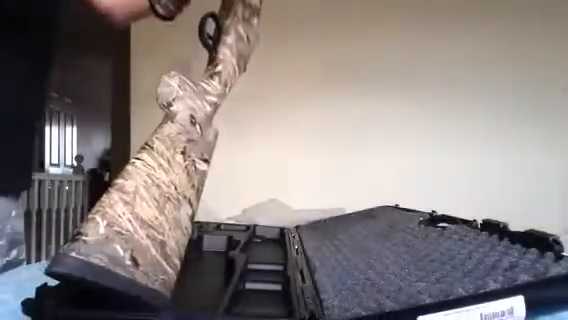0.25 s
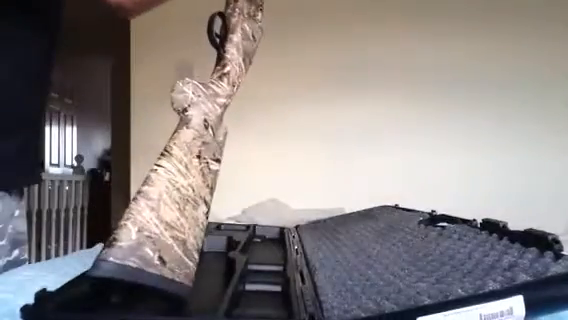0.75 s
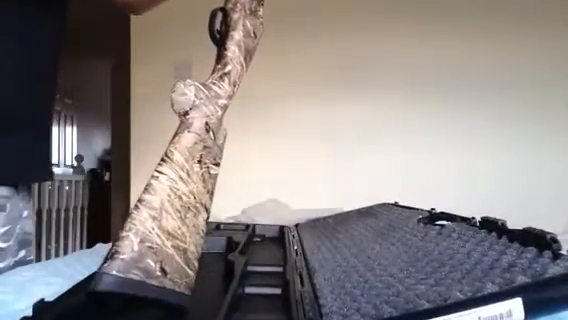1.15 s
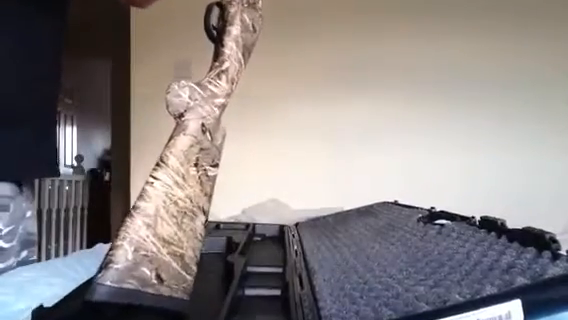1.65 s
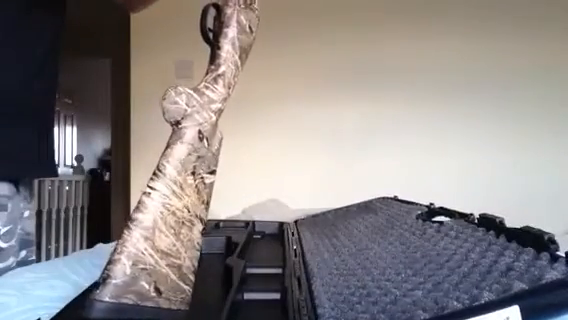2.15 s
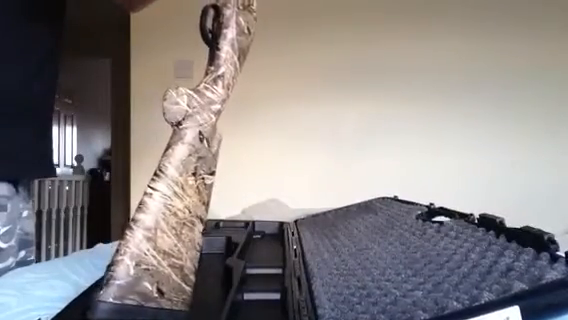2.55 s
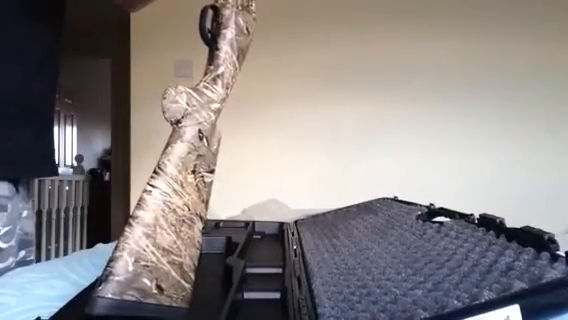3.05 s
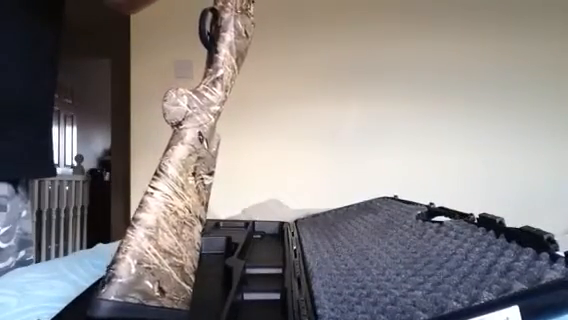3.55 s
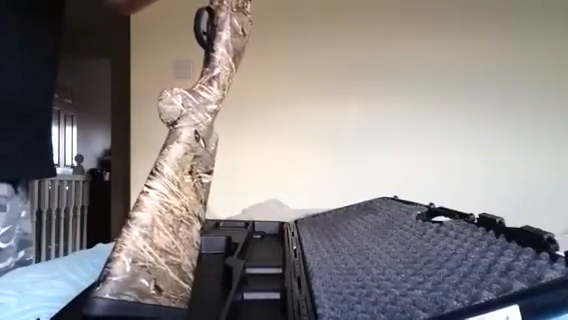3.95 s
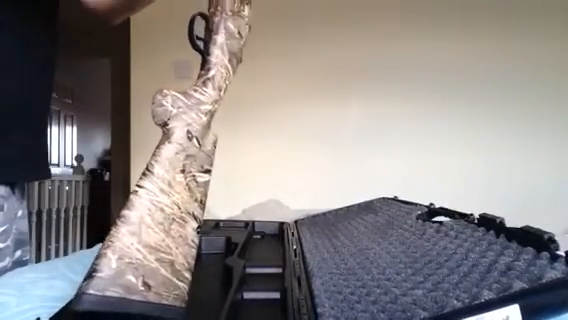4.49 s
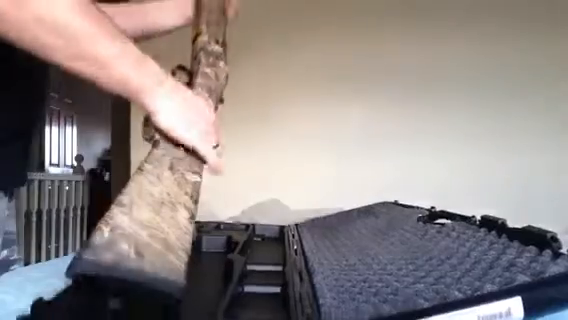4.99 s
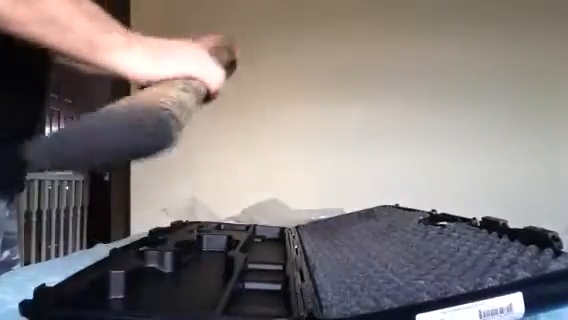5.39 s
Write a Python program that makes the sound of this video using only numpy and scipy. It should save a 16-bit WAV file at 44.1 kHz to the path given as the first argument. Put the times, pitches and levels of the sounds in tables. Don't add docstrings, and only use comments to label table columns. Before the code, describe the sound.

A long gun with plastic stock and steel barrel is assembled near a modest microphone indoors. Skin brushes and tiny clicks give way to a cluster of knocks and clinks; the barrel scrapes and slams home in a fast clatter. After near silence and a small knock, a latch cracks shut, then bright clicks and soft handling end it, with brief room reflections and a low noise floor.

```python
import sys
import numpy as np
from scipy import signal
from scipy.fft import rfft, irfft
from scipy.io import wavfile
from scipy.ndimage import uniform_filter1d

SR = 44100
rng = np.random.default_rng(int(sys.argv[2]) if len(sys.argv) > 2 else 0)


def dump(signal):
    limited = np.clip(np.atleast_2d(signal).T, -1, 1)
    pcm = np.round(limited * 32767).astype(np.int16)
    wavfile.write(sys.argv[1], SR, pcm)


def natural_amplitude(level_db):
    exponent = np.asarray(level_db, float) / 20
    return 10 ** exponent


N = 248266
RING_OUT = 6144

# f/Hz, level/dB, time to fall 60 dB t60/s
STOCK = [(260, -7.5, 0.05), (366, -8, 0.063), (489.7, 0, 0.12), (581, -2, 0.034), (679, -4, 0.058)]
TUBE = [(950, -6.5, .05), (1000, 0.5, 0.17), (1103.3, 3.5, 0.099), (1142, 5.5, 0.073), (1210, 0, 0.14),
        (1338, 0, 0.061), (1430, -15.5, 0.065), (1700, -10.5, 0.02)]
STEEL = [(2130, -4.1, 0.0086), (2330, -4, 0.022), (2490, 0.5, .025), (2750, 0, 0.043), (3200, 3.7, 0.036),
         (3730, 0.3, 0.033), (4240, -0.6, 0.015), (4625, -5, 0.005)]
EDGE = [(5140, 0.92, 0.013), (6130, 0.68, 0.037), (7180, 4.3, 0.054), (8120, 2.1, 0.03)]
# modes (as above), lowest f/Hz, highest f/Hz it radiates
PARTS = [
    (STOCK, 320, 800),
    (TUBE, 800, 1800),
    (STEEL, 1800, 5000),
    (EDGE, 5000, 10000),
    ([(13000, 0, .003)], 10000, 17000),
]

# peak t/s, rise/s, fall/s, peak level/dB, brightness/dB
HAND_RUBS = [(.001, .02, 0.028, -46, -1.5), (.116, 0.1, 0.027, -57.5, 3), (.304, 0.14, 0.035, -56.5, -0.5),
             (.45, .03, 0.074, -64, 1.5), (.634, 0.35, 0.066, -64.5, -1), (2.85, .08, 0.035, -59, -4),
             (3.044, 0.15, 0.043, -57.5, -4.5), (3.842, 0.063, 0.039, -63.5, 2),
             (4.526, .045, 0.021, -53, -2), (5.002, 0.19, 0.06, -62, 3.5), (5.38, 0.45, 0.26, -63, 1),
             (5.556, 0.022, 0.092, -65, 0)]
STOCK_DRAGS = [
    (.13, 0.29, .15, -65, 0),
    (.42, 0.33, 0.2, -67.5, 0),
    (.62, 0.24, 0.16, -64.5, 0),
    (.76, .1, 0.039, -71, 0),
    (4.43, 0.043, .04, -64.5, 0),
    (4.72, 0.054, 0.095, -64, 0.00039),
    (5.585, 0.039, 0.1, -61.5, 0.0033),
]
BARREL_SLIDES = [(1.418, .02, .1, -61, 1), (1.49, 0.054, .01, -52.5, -2), (1.835, .05, .2, -58, -4.5),
                 (1.895, .1, .1, -57, 4.5), (1.962, 0.11, .07, -48, -2.5), (2.14, .05, .15, -72.5, -8.5),
                 (2.362, 0.16, .01, -45.5, 2), (2.374, 0.015, .005, -30.5, 3.5),
                 (3.36, 0.031, .04, -67.5, -7), (3.455, 0.056, .005, -51, -2),
                 (3.961, 0.039, .005, -47, 2.5)]
# t/s, length/s, start f/Hz, glide/(Hz per s), level/dB
SQUEAKS = [
    (0.143, .045, 12150, 8000, -71),
    (0.185, .03, 12450, -40000, -81),
    (.33, 0.078, 13000, -13000, -76),
]

# t/s, steel peak level/dB, body level/dB re steel, edge level/dB re steel, struck spot f/Hz
TICKS = [(.4045, -38, -12, -5.5, 2500), (.414, -50.5, 3, -2, 2230), (.8531, -41, 2, 10, 3980),
         (.8595, -47.5, -3, -21, 430), (4.3844, -55, 2, 0, 3200), (4.6991, -53, -3, 6.5, 3155),
         (5.0547, -26, -12.5, 8, 3200), (5.0568, -32.5, 3.5, -2, 1087), (5.0715, -39, 4.5, -10, 5000),
         (5.2683, -58.5, 7, -2, 3830), (5.5496, -55, -7, -6, 3476)]
THUDS = [
    (1.3204, -50.5, 8, -21, 1200),
    (1.3304, -51.5, 4.5, -23, 1110),
    (1.4975, -37, 3.5, 1, 1530),
    (1.512, -40.5, -2, -19, 726),
    (1.5344, -42, 1.5, -16, 1560),
    (1.6347, -37.5, 0, -7, 3900),
    (3.4605, -35.5, -1.5, -22, 1506),
    (3.469, -44.5, -5, -22, 1150),
    (4.2243, -52.5, 2, -19, 2130),
]
CLINKS = [
    (1.6511, -28, -6, -3, 3500),
    (1.662, -56, -15, -24, 4200),
    (1.7784, -43.5, 9, -28, 2760),
    (1.9214, -48, 7.5, 2, 1570),
    (2.1554, -56, 2, -11, 1970),
    (2.2453, -47, -8, -9, 6330),
    (2.2907, -46, 0, -5.5, 2130),
    (2.6459, -55, 3.5, 1, 4400),
    (2.7302, -34.5, -2, -10.5, 1380),
    (3.8394, -61, 2.5, -5, 1279),
]
SEATING = [
    (2.378, -11, -9.5, -17.5, 3007),
    (2.3815, -8.5, -4.5, -2.5, 2750),
    (2.3875, -11.5, 6.5, -14, 3390),
    (2.3935, -17, -1, -10.5, 4234),
    (2.3996, -16, -6, -10, 3827),
    (2.407, -23, 4, -10.5, 5000),
    (2.4104, -13.5, 0, -1.5, 2600),
    (2.4304, -22, -4.5, -7.5, 2770),
]
LATCH = [
    (3.9689, -10.5, -9.5, 4, 3830),
    (3.9734, -22, -5.5, -16, 1026),
    (3.9815, -27, -37, -3, 7100),
]
# t/s, f/Hz, peak level/dB, t60/s
RINGS = [(1.322, 487, -38, 0.027), (1.4985, 366, -40, .14), (1.4985, 1005, -34, 0.04),
         (1.499, 2280, -44, .04), (1.499, 3936, -42.5, 0.062), (1.640, 508, -40.5, 0.037),
         (1.6515, 1174, -40.5, 0.087), (1.6515, 1760, -36, 0.016), (1.6515, 3415, -30.5, .03),
         (1.6515, 4090, -38, 0.051), (1.779, 1127, -43, .04), (1.799, 1200, -51, 0.16),
         (1.922, 725, -47.5, 0.11), (2.156, 1150, -52, 0.033), (2.379, 1142, -15, .07),
         (2.379, 326, -28, .04), (2.246, 5700, -52, 0.067), (2.731, 2270, -46.5, 0.022),
         (3.461, 726, -38, 0.027), (3.9695, 1162, -21.5, 0.012), (3.9695, 660, -27.5, .02),
         (4.225, 712, -46, 0.037), (.854, 2670, -42.5, 0.017), (.868, 990, -47, 0.028),
         (3.04, 1510, -54, 0.051), (2.731, 330, -48.5, .03), (3.836, 1263, -56, .02)]

# f/Hz, t60/s, level/dB
BEDROOM = [(255, 0.27, -13), (597.3, .36, -5), (1200, 0.34, -7.5), (2500, 0.27, -7.5), (5000, 0.23, -3.5),
           (8400, 0.21, -0.5), (14800, 0.19, -2)]
# delay t/s, level/dB
ECHOES = [(.0048, -13), (.0092, -16), (0.0144, -12.5), (0.018, -14)]
# f/Hz, level/dB per Hz
FLOOR = [(30, -29.5), (69, -36), (95, -20.5), (248, -7), (400, -16.5), (1120, -24), (1600, -27.5),
         (15200, -30.5)]
# f/Hz, rms level/dB
HUM = [(102.3, -82)]


def rms_one(x):
    return x / np.sqrt(np.mean(x ** 2) + 1e-20)


def at_hz(points, hz, column=1):
    points = np.array(points)
    return np.interp(np.log(hz), np.log(points[:, 0]), points[:, column])


def band(x, low_hz, high_hz):
    return signal.sosfilt(signal.butter(2, [low_hz, high_hz], "band", fs=SR, output="sos"), x)


def ring(force, hz, t60):
    r = natural_amplitude(-60 / (max(t60, .002) * SR))
    w = 2 * np.pi * hz / SR
    return signal.lfilter([.5, 0, -.5], [1, -2 * r * np.cos(w), r * r], force + 1e-18)


def floor():
    hz = np.maximum(np.fft.rfftfreq(N, 1 / SR), 1)
    noise = rms_one(irfft(rfft(rng.standard_normal(N)) * natural_amplitude(at_hz(FLOOR, hz)), N))
    t = np.arange(N) / SR
    hum = sum(np.sqrt(2) * natural_amplitude(db) * np.sin(2 * np.pi * f * t) for f, db in HUM)
    return natural_amplitude(-62) * noise + hum


def slides(rows, body, body_db, steel_db, edge_db, top_hz, slips_per_s, grain_db):
    slipping = rng.random(N) < slips_per_s / SR
    size = natural_amplitude(grain_db * np.minimum(rng.exponential(1, N), 4))
    slips = slipping * size * rng.choice([-1, 1], N)
    t = np.arange(0, N + 16, 16) / SR
    strokes = []
    for s, rise, fall, db, _ in rows:
        away = np.maximum((s - t) / max(rise, .003), (t - s) / max(fall, .003))
        strokes.append(natural_amplitude(db - 25 * away))
    out = 0
    for part, low_hz, high_hz, rub, part_db, tilt in ((body, 400, 1800, .7, body_db, -1),
                                                      (STEEL, 1800, 5000, 2.6, steel_db, 0),
                                                      (EDGE, 5000, top_hz, 5.5, edge_db, 1)):
        rings = rms_one(sum(natural_amplitude(db) * ring(slips, hz, t60) for hz, db, t60 in part))
        rubbing = rms_one(band(slips, low_hz, high_hz))
        sound = rms_one(band(rings, low_hz, high_hz) + rub * rubbing)
        swell = sum(natural_amplitude(part_db + tilt * row[4]) * stroke for row, stroke in zip(rows, strokes))
        out = out + sound * np.interp(np.arange(N) / SR, t, swell)
    return out


def hand_rubs():
    return slides(HAND_RUBS, STOCK[2:] + TUBE[3:], body_db=-11, steel_db=-4.5, edge_db=-3.5,
                  top_hz=17000, slips_per_s=9900, grain_db=4.0)


def stock_drags():
    return slides(STOCK_DRAGS, STOCK[3:], body_db=-1.5, steel_db=-8, edge_db=-30,
                  top_hz=9000, slips_per_s=3000, grain_db=6)


def squeaks():
    t, out = np.arange(N) / SR, 0
    for s, length, hz, glide, db in SQUEAKS:
        since = np.clip(t - s, 0, length)
        gate = np.clip(np.minimum(since, length - since) / .008, 0, 1)
        cycles = hz * since + glide * since ** 2 / 2
        out = out + np.sqrt(2) * gate * natural_amplitude(db) * np.sin(2 * np.pi * cycles)
    return out


def flurry(ms):
    fall = 3000 * np.arange(RING_OUT) / SR / max(ms, .2)
    burst = rfft(rng.standard_normal(RING_OUT) * np.sqrt(fall) * np.exp(-fall))
    flat = irfft(burst / (uniform_filter1d(np.abs(burst), size=18) + 1e-9))
    return flat * np.exp(-fall / 4)


def contacts(rows, ms, damping, crack, spot_db, spot_cycles, top_db, stock_db, stock_follows):
    out = np.zeros(N + RING_OUT)
    for s, steel_db, body, edge, spot_hz in rows:
        force, hit = flurry(ms), 0
        levels_db = (stock_db + stock_follows * body, body, 0, edge, edge + top_db)
        for (part, low_hz, high_hz), part_db in zip(PARTS, levels_db):
            grip = rng.standard_normal((len(part), 2))
            rings = 0
            for (hz, db, t60), (a, b) in zip(part, grip):
                rings = rings + natural_amplitude(db + 3 * a) * ring(force, hz * (1 + .01 * b), t60 * damping)
            broad = crack * min(low_hz / 1800, 1) * rms_one(band(force, low_hz, high_hz))
            voice = band(rms_one(rings), low_hz, high_hz) + broad
            voice = band(voice, .8 * low_hz, 1.2 * high_hz)
            hit = hit + natural_amplitude(part_db) * voice / np.max(np.abs(voice))
        spot = band(ring(force, spot_hz, spot_cycles / spot_hz), 0.47 * spot_hz, 1.23 * spot_hz)
        hit = hit + natural_amplitude(spot_db) * spot / np.max(np.abs(spot))
        out[round(s * SR):][:RING_OUT] += natural_amplitude(steel_db - 2.0) * hit
    return out[:N]


def light_ticks():
    return contacts(TICKS, ms=0.6, damping=.2, crack=4.4, spot_db=1.0, spot_cycles=13.5,
                    top_db=1.5, stock_db=-3.0, stock_follows=0.54)


def case_echo(ticks):
    return natural_amplitude(-7) * np.roll(ticks, round(.00105 * SR))


def loose_rings():
    out = np.zeros(N + RING_OUT)
    for s, hz, db, t60 in RINGS:
        force = flurry(4.6)
        pair = ring(force, hz, t60) + 0.22 * ring(force, 0.94 * hz, t60)
        pair = band(pair, .8 * hz, 1.25 * hz)
        out[round(s * SR):][:RING_OUT] += natural_amplitude(db) * pair / np.max(np.abs(pair))
    return out[:N]


def dull_thuds():
    return contacts(THUDS, ms=6.3, damping=0.29, crack=0.8, spot_db=2.5, spot_cycles=15.0,
                    top_db=-16, stock_db=2.0, stock_follows=0.93)


def barrel_slides():
    return slides(BARREL_SLIDES, STOCK[2:] + TUBE, body_db=-6, steel_db=-5.5, edge_db=-10.5,
                  top_hz=12000, slips_per_s=5400, grain_db=3.5)


def metal_clinks():
    return contacts(CLINKS, ms=3.9, damping=0.29, crack=.7, spot_db=-1.0, spot_cycles=15.0,
                    top_db=-15, stock_db=-7.5, stock_follows=1.1)


def butt():
    push = np.zeros(N)
    push[round(SEATING[0][0] * SR)] = natural_amplitude(-36.5)
    return band(2 * ring(push, 243, 0.033), 150, 400)


def barrel_seating():
    return contacts(SEATING, ms=5.2, damping=0.5, crack=1.4, spot_db=-2.0, spot_cycles=12.0,
                    top_db=-5, stock_db=-12.5, stock_follows=-0.091) + butt()


def latch_snap():
    return contacts(LATCH, ms=3.2, damping=0.07, crack=1.3, spot_db=-7.5, spot_cycles=13.6,
                    top_db=0.0, stock_db=-38, stock_follows=-0.104)


def bedroom(x):
    t = np.arange(SR // 2) / SR
    edges = 220 * 2 ** np.arange(0, 6.4, 1 / 3)
    white, tail = rng.standard_normal((2, len(t))), 0
    for k, (low, high) in enumerate(zip(edges, edges[1:])):
        hz = np.sqrt(low * high)
        decay_db = at_hz(BEDROOM, hz, column=2) - 60 * t / at_hz(BEDROOM, hz)
        tail = tail + band(white[k % 2], low, high) * natural_amplitude(decay_db)
    modes = rfft(tail, SR)
    power = np.abs(modes) ** 2 + 1e-12
    evening = np.sqrt(uniform_filter1d(power, size=400) / uniform_filter1d(power, size=70))
    tail = irfft(modes * evening)[:len(t)]
    tail = natural_amplitude(-26) * tail * (1 - np.exp(-(t / 0.0044) ** 2))
    for s, db in ECHOES:
        tail[round(s * SR)] += natural_amplitude(db)
    return signal.fftconvolve(x, tail)[:N]


def scene():
    background = floor()
    moving = hand_rubs() + stock_drags() + squeaks() + loose_rings() + barrel_slides()
    ticks, thuds, clinks = light_ticks(), dull_thuds(), metal_clinks()
    seating, latch = barrel_seating(), latch_snap()
    to_room = natural_amplitude(-0.5) * ticks + natural_amplitude(1.9) * thuds + natural_amplitude(3.0) * clinks
    to_room = to_room + natural_amplitude(-0.54) * seating + natural_amplitude(6.5) * latch + moving
    direct = ticks + case_echo(ticks) + thuds + clinks + seating + latch + moving
    return (direct + bedroom(to_room) + background)[None]


def top_cut(x):
    return signal.sosfilt(signal.butter(12, 16620, fs=SR, output="sos"), x)


def record(dry):
    rounded = 1.5 * np.tanh(dry / 1.5)
    thin = signal.sosfilt(signal.butter(2, 45, "high", fs=SR, output="sos"), rounded)
    cut = signal.sosfilt(signal.cheby2(12, 24, 15500, fs=SR, output="sos"), thin)
    return top_cut(cut)


dry = scene()
out = record(dry)
dump(out)
```